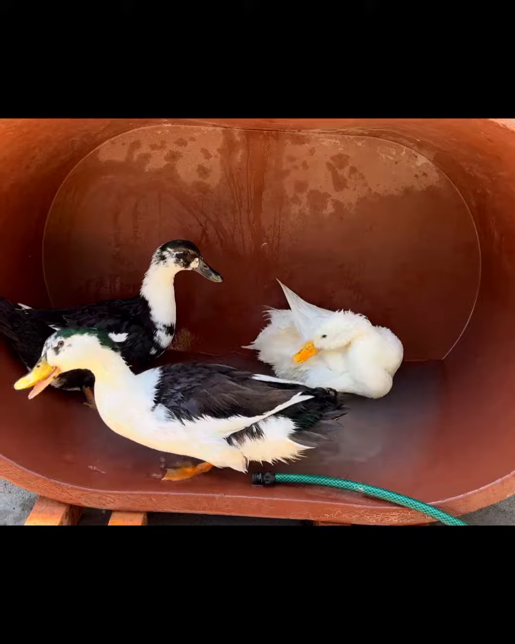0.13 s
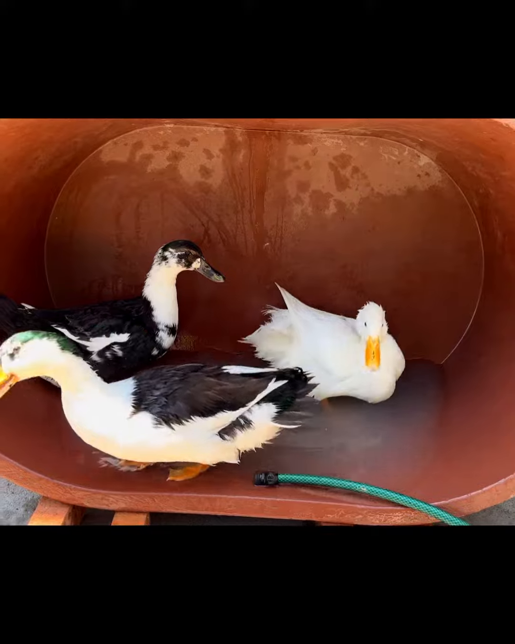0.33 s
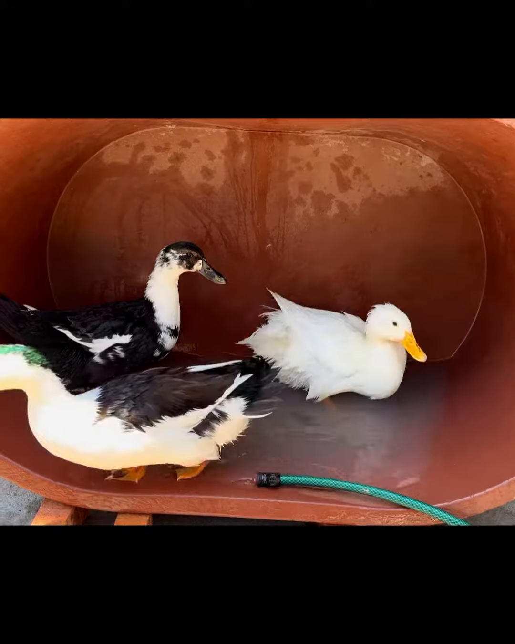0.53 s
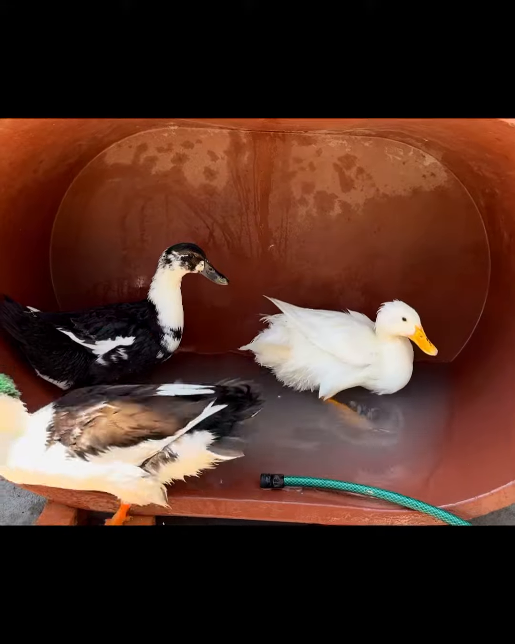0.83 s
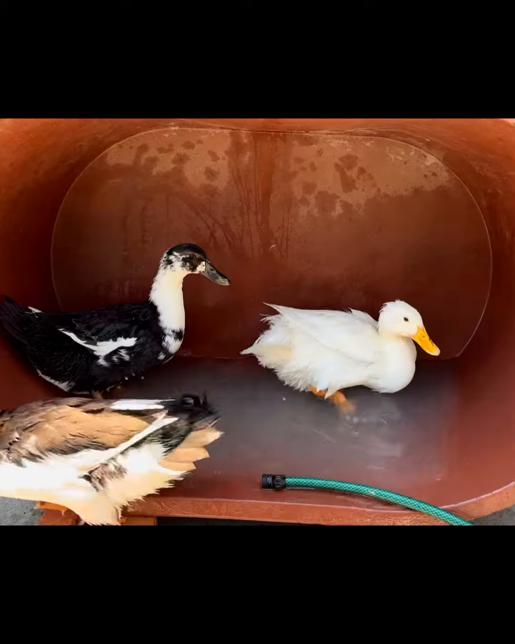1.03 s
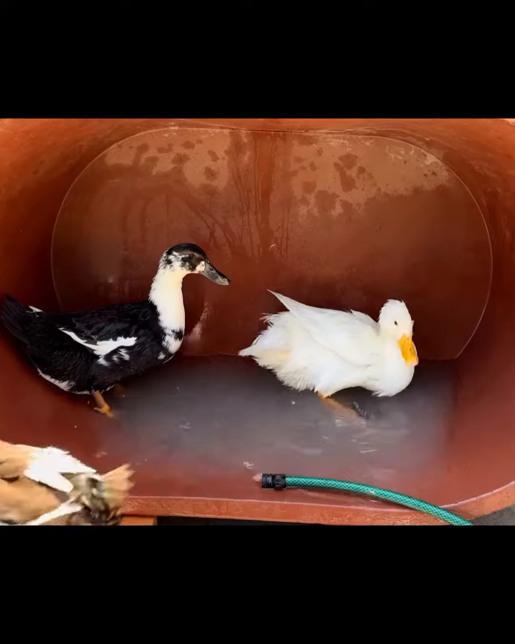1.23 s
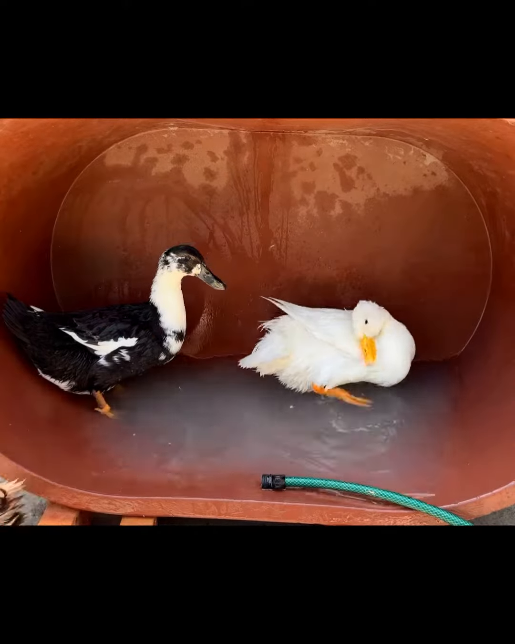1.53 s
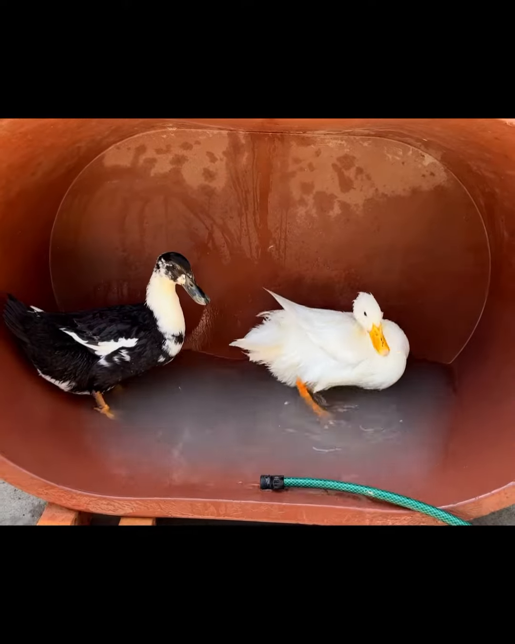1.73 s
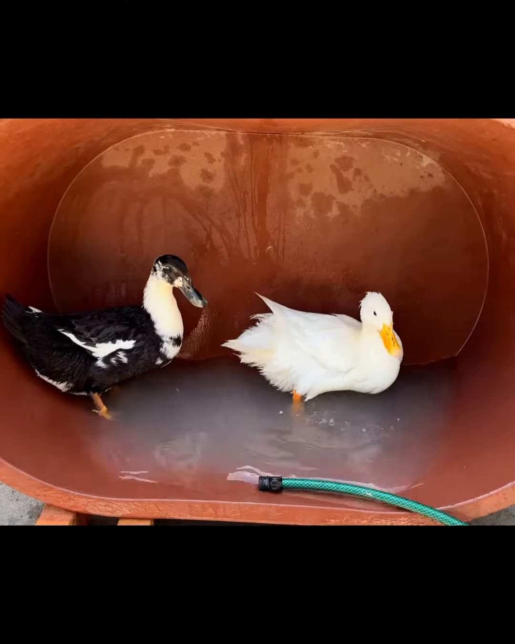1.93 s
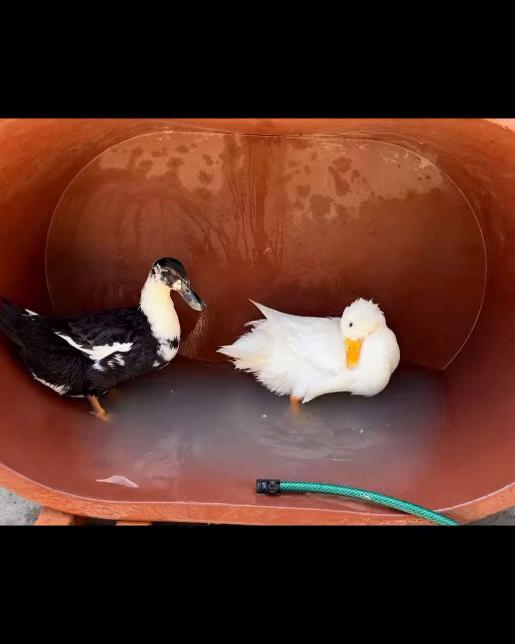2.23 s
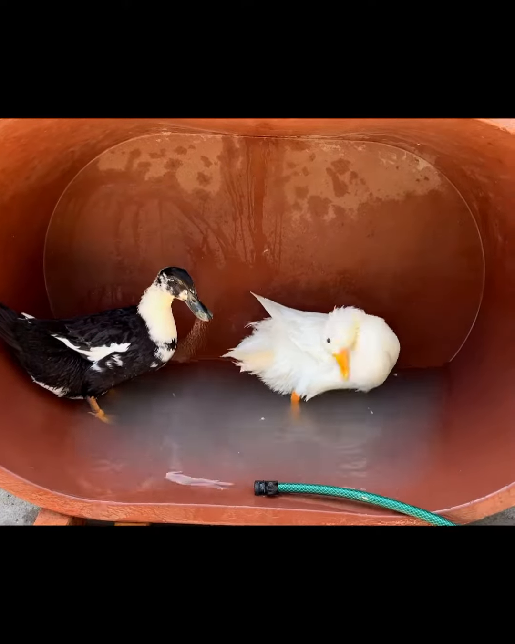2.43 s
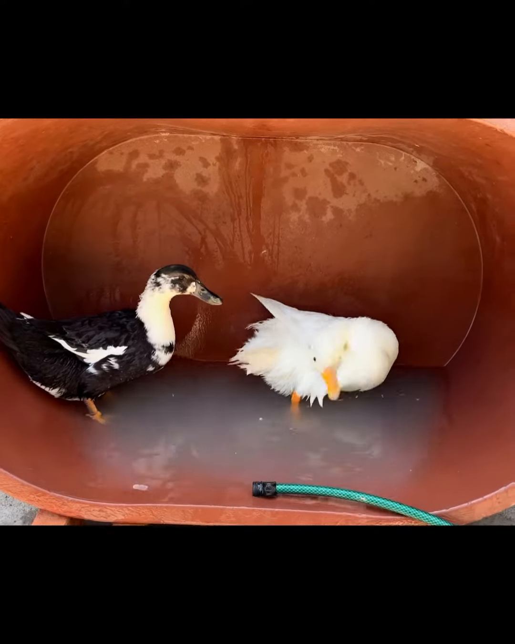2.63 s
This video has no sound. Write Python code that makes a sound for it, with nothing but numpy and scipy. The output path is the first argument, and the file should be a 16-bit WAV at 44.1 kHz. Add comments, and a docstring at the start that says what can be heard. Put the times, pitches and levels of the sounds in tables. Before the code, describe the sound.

Hoarse, breathy duck huffs with thin wavering whistles come close together from the start to about 0.7 s, strongest around 0.2-0.6. A faint bird trill follows at 0.8. Softer huffs come at 1.1, 1.4 and 1.6, a strong one at 2.0, then weak breaths from 2.4. Another trill sounds around 2.55-2.77. Wind rumble, wavering low hum and dull outdoor wash continue underneath, with a short tub ring.

```python
"""Ducks in a shallow tub huff hoarse breaths: shaped noise with thin wandering tones in it.
Short bending tones make wavering whistles inside the huffs; rows of falling notes make a small bird's
trill further off. The tub and yard ring briefly after these tones. Below lie wind rumble and a dull outdoor
wash, both of coloured noise, and a low hum of one narrow band. A phone microphone pair widens the picture."""
import sys
import numpy as np
from scipy import signal
from scipy.io import wavfile
from scipy.ndimage import uniform_filter1d

SR = 44100
rng = np.random.default_rng(int(sys.argv[2]) if len(sys.argv) > 2 else 0)


def persist_wave(psi):
    """Save psi, clipped to +-1, as 16-bit WAV."""
    counts = np.round(np.clip(psi, -1, 1) * 32767).astype(np.int16)
    wavfile.write(sys.argv[1], SR, np.atleast_2d(counts).T)


def ratio_of_db(decibels):
    """Turn decibels (scalar or array-like) into linear amplitude factors; 0 dB maps to 1."""
    return 10 ** (np.asarray(decibels, float) / 20)


N = 122598  # length [samples]


def read(points, hz, column=1):
    """Looks up a table column by pitch, on a log-frequency axis."""
    p = np.array(points)
    return np.interp(np.log(hz + 1), np.log(p[:, 0] + 1), p[:, column])


def curve(points):
    """Turns a level table into a gain for every sample, silent outside its times."""
    s, db = np.transpose(points)
    return ratio_of_db(np.interp(np.arange(N) / SR, s, db, left=-200, right=-200))


def evened(x):
    """Scales to an rms of 1."""
    return x / np.sqrt(np.mean(x ** 2) + 1e-20)


def smoothed(x, first, second):
    """Averages twice over neighbouring samples, then scales to an rms of 1."""
    return evened(uniform_filter1d(uniform_filter1d(x, size=first), size=second))


def add(mix, s, sound):
    """Mixes a sound in at s seconds."""
    part = mix[round(s * SR):][:len(sound)]
    part += sound[:len(part)]


# how alike the noise is at the two microphone ports: (pitch [Hz], alike share [0-1])
PORT_LIKENESS = [(80, 1), (300, 1), (700, 0.81), (1300, 0.69), (1900, 0.08), (3000, 0.21), (4700, 0.82)]
# the same for the treble: (pitch [Hz], alike share [0-1])
PORT_LIKENESS_TREBLE = [(5500, .998)]


def noise(colour, patchy_db, size):
    """Coloured noise with drifting louder and softer patches; the two ports share part of it."""
    frames, hz = 4 * N // size + 5, np.fft.rfftfreq(size, 1 / SR)
    a, b, c, d, patches = rng.standard_normal((frames, len(hz), 5)).T
    patches = uniform_filter1d(patches, size=6, axis=0)  # over pitch
    patches = evened(uniform_filter1d(patches, size=8, axis=1))  # over time
    same = np.clip(read(PORT_LIKENESS + PORT_LIKENESS_TREBLE, hz), 0, 1)[:, None]
    left = a + 1j * b
    right = same * left + np.sqrt(1 - same ** 2) * (c + 1j * d)
    z = np.array([left, right]) * ratio_of_db(read(colour, hz)[:, None] + patchy_db * patches)
    return evened(signal.istft(z, nperseg=size, noverlap=size * 3 // 4)[1][:, :N])


# each huff, its level before rise and sag: (start [s], length before the fade [s], level [dB])
HUFF_TIMES = [(0.006, 0.15, -54.5), (0.202, 0.17, -52.5), (0.444, 0.15, -49), (0.58, 0.11, -59),
              (1.094, 0.12, -58.5), (1.366, 0.15, -57), (1.617, 0.13, -56), (2, 0.14, -48.5),
              (2.38, 0.18, -63), (2.522, 0.37, -64.5)]
# colour of the breath: (pitch [Hz], relative level per hertz [dB])
BREATH_COLOUR = [(900, -47.5), (1600, -16), (2700, -7), (3400, -6.5), (4200, -1.5), (5200, -12.5),
                 (7000, -14), (9500, -22.5), (11500, -32), (15500, -56)]
# thin wandering tones in the breath: middle pitch [Hz]
STRAND_PITCHES = [2012, 2490, 3020, 3340, 3773, 4084, 4530, 5170, 6500]
HUFF_RISE_S, HUFF_SAG_DB, HUFF_FADE_DB_PER_S = .05, -2.5, 148.5
BREATH_PATCHY_DB = 2
STRAND_DB = 0  # all strands together, against the breath noise
STRAND_WANDER, STRAND_FLICKER_DB = .055, 4.5  # rms pitch wander [share], rms level flicker


def huffs():
    """Breath rushing through open bills: quick rise, slight sag, a fading tail; thin tones wander in it."""
    t, level = np.arange(N) / SR, np.zeros(N)
    for start, length, db in HUFF_TIMES:
        u = t - start
        rise = np.clip(u / HUFF_RISE_S, 0, 1) ** 2
        sag_db = HUFF_SAG_DB * np.clip(u / length, 0, 1)
        fade_db = HUFF_FADE_DB_PER_S * np.maximum(u - length, 0)
        level += rise * ratio_of_db(db + sag_db - fade_db)
    strands = np.zeros(N)
    for hz in STRAND_PITCHES:
        wander, flicker = (smoothed(v, 260, 160) for v in rng.standard_normal((2, N)))
        turn = 2 * np.pi * np.cumsum(hz * (1 + STRAND_WANDER * wander)) / SR
        strands += ratio_of_db(read(BREATH_COLOUR, hz) + STRAND_FLICKER_DB * flicker) * np.sin(turn)
    breath = noise(BREATH_COLOUR, BREATH_PATCHY_DB, size=256)
    return level * (breath + ratio_of_db(STRAND_DB) * evened(strands))


# whistles, with the level at the top of the swell, without the octave:
# (start [s], length [s], first pitch [Hz], middle pitch [Hz], last pitch [Hz], level [dB rms])
WHISTLE_NOTES = [ (.057, .031, 2450, 2950, 3600, -48), (.086, .02, 3300, 2800, 2450, -49),
                 (.112, .014, 4400, 4550, 4100, -51), (.125, .016, 3300, 3300, 3450, -48),
                 (.141, .011, 3500, 2900, 2700, -47), (.124, .022, 5300, 5000, 5200, -55),
                 (.213, .016, 4150, 4550, 4850, -50), (.232, .026, 4750, 4600, 4600, -48),
                 (.215, .015, 2600, 2800, 3100, -50), (.229, .017, 2600, 2200, 2850, -46),
                 (.252, .018, 2900, 2450, 2750, -46), (.267, .018, 2700, 2200, 1700, -50),
                 (.269, .012, 4000, 4700, 4000, -44), (.284, .014, 4600, 4050, 4400, -47),
                 (.283, .017, 3000, 2700, 3000, -46), (.297, .032, 1900, 2350, 1650, -46),
                 (.3, .025, 4400, 4750, 4000, -44), (.324, .015, 4300, 4500, 3900, -46),
                 (.33, .026, 2100, 2750, 2300, -48), (.352, .022, 4100, 4300, 4750, -46),
                 (.48, .01, 3050, 3100, 3100, -47), (.496, .024, 3000, 3450, 3550, -49),
                 (.508, .015, 4550, 4600, 4700, -49), (.52, .048, 4000, 4050, 4050, -45),
                 (.52, .015, 2600, 2650, 2600, -50), (.515, .048, 5350, 5050, 5250, -55),
                 (.58, .024, 4200, 4000, 4350, -49), (.628, .016, 3800, 3750, 3700, -52),
                 (1.182, .03, 4300, 3250, 3200, -54), (1.395, .035, 4150, 4100, 4200, -52),
                 (1.435, .04, 4450, 4750, 4950, -57), (1.477, .014, 3700, 3200, 3700, -53),
                 (1.48, .03, 4000, 4150, 4500, -55), (1.638, .025, 2400, 2850, 3150, -49),
                 (1.65, .012, 3800, 4050, 4200, -51), (1.666, .028, 3300, 2200, 2900, -48),
                 (1.68, .035, 4450, 4450, 4300, -54), (1.707, .01, 3300, 2500, 2100, -48),
                 (1.711, .012, 3300, 2650, 3100, -46), (2.036, .033, 2550, 2700, 2800, -42),
                 (2.044, .008, 4500, 4500, 4450, -48), (2.096, .013, 2300, 2500, 2250, -48),
                 (2.077, .024, 4400, 4200, 4400, -47), (2.11, .02, 4300, 4000, 4200, -47),
                 (2.112, .01, 3050, 3050, 2900, -47), (2.13, .055, 4300, 4150, 4500, -52),
                 (2.454, .02, 3250, 3050, 3050, -54)]
ROUGH_HZ = 4200  # the higher the whistle, the rougher; the next two hold at this pitch
WHISTLE_FUZZ, WHISTLE_JITTER = .4, .014  # level flutter, pitch jitter [rms share]
OCTAVE_DB = -23  # octave against the main tone


def whistle(start, length, first_hz, middle_hz, last_hz, db):
    """A short tone that bends through three pitches, fluttering in level and pitch."""
    u = np.arange(0, length, 1 / SR) / length
    unsteady = smoothed(rng.standard_normal((2, 4000)), 90, 60)[:, :len(u)]
    flutter, jitter = (middle_hz / ROUGH_HZ) ** 2 * unsteady
    bend = np.polyfit([0, .5, 1], [first_hz, middle_hz, last_hz], deg=2)
    hz = np.polyval(bend, u) * (1 + WHISTLE_JITTER * jitter)
    turn = 2 * np.pi * np.cumsum(hz) / SR
    swell = (1 + WHISTLE_FUZZ * flutter) * np.sqrt(np.sin(np.pi * u))
    tone = np.sin(turn) + ratio_of_db(OCTAVE_DB) * np.sin(2 * turn)
    return start, np.sqrt(2) * ratio_of_db(db) * swell * tone


# trills of the far bird, with the level before swell and unevenness, without the overtone:
# (start [s], length [s], first pitch [Hz], last pitch [Hz], level [dB rms], overtone against tone [dB])
TRILL_ROWS = [(.822, .088, 2780, 2750, -52.5, -20), (2.545, .09, 2600, 2850, -56, -5),
              (2.637, .133, 2780, 2600, -52, -5)]
TRILL_PER_S, NOTE_DROP_HZ = 45, 200
TRILL_OVERTONE = 1.71  # overtone pitch over main pitch


def trill(start, length, first_hz, last_hz, db, overtone_db):
    """Quick falling notes evenly spaced in a row, each with its own loudness."""
    t = np.arange(0, length, 1 / SR)
    u = t * TRILL_PER_S % 1  # place within the note
    glide_hz = first_hz + (last_hz - first_hz) * t / length
    turn = 2 * np.pi * np.cumsum(glide_hz + NOTE_DROP_HZ * (.5 - u)) / SR
    uneven = ratio_of_db(1.5 * rng.standard_normal(16))[(t * TRILL_PER_S).astype(int)]
    swell = uneven * np.sin(np.pi * t / length) ** .15 * np.sin(np.pi * u) ** 2
    tone = np.sin(turn) + ratio_of_db(overtone_db) * np.sin(TRILL_OVERTONE * turn)
    return start, np.sqrt(2) * ratio_of_db(db) * swell * tone


TUB_T60_S, TUB_DB = .2, -14  # time to ring down by 60 dB, level of the ring


def tub(x):
    """Short ring of tub walls and yard: a fading noise tail, different at each port."""
    t = np.arange(SR // 2) / SR
    tail = rng.standard_normal((2, len(t))) * ratio_of_db(-60 * t / TUB_T60_S) * (t > .003)
    tail /= np.linalg.norm(tail[0])
    return ratio_of_db(TUB_DB) * signal.fftconvolve(x[None], tail, axes=1)[:, :N]


# colour of the wind: (pitch [Hz], relative level per hertz [dB])
WIND_COLOUR = [(15, -45), (25, -47), (40, -14), (50, -7), (59, 0), (70, -4.5), (82, 1), (100, -7),
               (140, -7.5), (240, -15.5), (400, -29), (800, -72.5)]
# gusts: (time [s], level [dB])
WIND_GUSTS = [(0, -31), (.4, -33), (.8, -34), (1.1, -34.5), (1.3, -36.5), (1.6, -36), (1.9, -38.5),
              (2.2, -34.5), (2.55, -39.5), (2.79, -34.5)]


def wind():
    """Wind rumble: low noise that rises and falls with the gusts."""
    return curve(WIND_GUSTS) * noise(WIND_COLOUR, 2.05, size=4096)


# loudness of the hum: (time [s], level [dB])
HUM_LEVEL = [(0, -34.5), (.35, -34.5), (.62, -38), (.75, -48), (1.05, -40.5), (1.2, -58.5), (1.9, -44),
             (2.06, -40.5), (2.2, -50.5), (2.65, -39), (2.79, -48)]
HUM_HZ, HUM_WIDTH_HZ = 122.44, 2.2  # middle, width of the wavering part


def hum():
    """A steady tone plus a narrow wavering band around it, the same at both ports."""
    r = np.exp(-np.pi * HUM_WIDTH_HZ / SR)
    slow = rng.standard_normal(N) + 1j * rng.standard_normal(N)
    slow = 0.03 + signal.lfilter([1 - r], [1, -r], slow)  # 0.03 is the steady part
    tone = (slow * np.exp(2j * np.pi * HUM_HZ * np.arange(N) / SR)).real
    return curve(HUM_LEVEL) * evened(tone)


# colour of the outdoor wash: (pitch [Hz], relative level per hertz [dB])
WASH_COLOUR = [(150, -10), (300, -1.5), (500, -5), (680, -8), (1000, -7), (1700, -18.5), (2500, -21),
               (4000, -28.5), (6000, -38), (10000, -53.5), (12000, -59.5), (13700, -50.5), (14300, -67),
               (16000, -78)]
WASH_DB = -45.5


def wash():
    """Dull outdoor wash: noise at one overall level, weak in the treble."""
    return ratio_of_db(WASH_DB) * noise(WASH_COLOUR, 2.41, size=1024)


def scene():
    """Everything at the two microphone ports."""
    tones = np.zeros(N)
    for row in WHISTLE_NOTES:
        add(tones, *whistle(*row))
    for row in TRILL_ROWS:
        add(tones, *trill(*row))
    rumble = wind()
    return tones + tub(tones) + huffs() + rumble + hum() + wash()


# stereo picture: (pitch [Hz], left over right [dB], turn of the right side before the lag [rad])
STEREO = [(81, -0.5, -5.5), (175, 4, -5), (248, 13.5, -5), (387, 14.5, -8), (454, 9.5, -7.5),
          (624, 3, -8.5), (935, 4.5, -8.5), (1520, 1.5, -7), (1970, -1, -3.5), (2250, 2, -6.5),
          (3380, -1.5, -5.5), (4603, -1, -3.5), (5080, -25, -0.8)]
# the same for the treble: (pitch [Hz], left over right [dB], turn of the right side before the lag [rad])
STEREO_TREBLE = [(5600, 0, 0)]
PORT_LAG_S = .000246  # right behind left
PORT_DWELL = .28  # [rad] the treble turn lingers near in-phase and opposite phase
MONO_FIRST_HZ, MONO_LAST_HZ, MONO_SETTLE_S = 324, 47.5, .72  # the bass is mono below an edge that sinks
START_S = .035  # silent before this


def two_ports(dry):
    """Turns and tilts the right port against the left and keeps the deep bass mono."""
    hz, t, (left, right) = signal.stft(dry, SR, nperseg=2048, noverlap=1536)
    picture = STEREO + STEREO_TREBLE
    tilt = ratio_of_db(read(picture, hz))[:, None]
    balance = np.sqrt(2 / (1 + tilt ** 2))  # keeps the power of an equal pair
    lag = 2 * np.pi * hz * PORT_LAG_S
    lag -= PORT_DWELL * np.sin(2 * lag) * (hz > STEREO_TREBLE[0][0])
    turn = read(picture, hz, column=2) - lag
    left = left * tilt * balance
    right = right * balance * np.exp(1j * turn)[:, None]
    edge_hz = MONO_LAST_HZ + (MONO_FIRST_HZ - MONO_LAST_HZ) * np.exp(-t / MONO_SETTLE_S)
    mid = (left + right) / 2
    side = (left - right) / 2 / (1 + (edge_hz / (hz[:, None] + 1)) ** 14.0)
    return signal.istft(np.array([mid + side, mid - side]), SR, nperseg=2048, noverlap=1536)[1][:, :N]


def roll_off(x):
    """The treble ends steeply here."""
    return signal.sosfilt(signal.butter(12, 16540, fs=SR, output="sos"), x)


def record(dry):
    """The phone microphone pair: widens the picture and starts after a moment of silence."""
    mix = two_ports(dry) * (np.arange(N) > START_S * SR)
    return roll_off(mix)


dry = scene()
out = record(dry)
persist_wave(out)
```